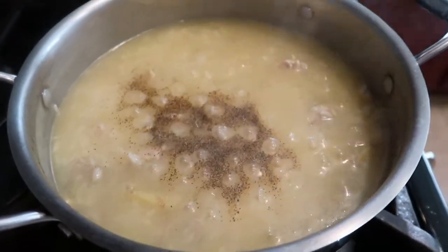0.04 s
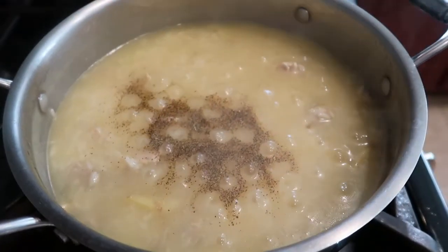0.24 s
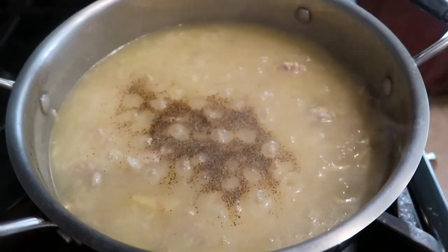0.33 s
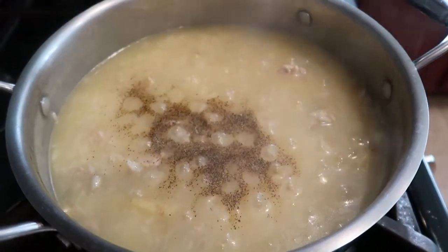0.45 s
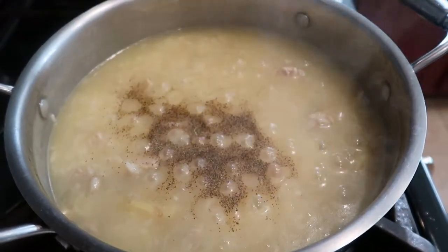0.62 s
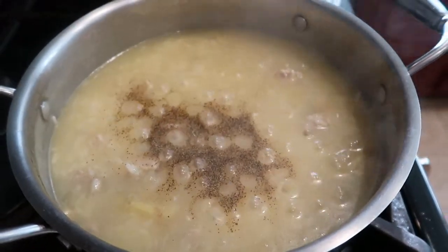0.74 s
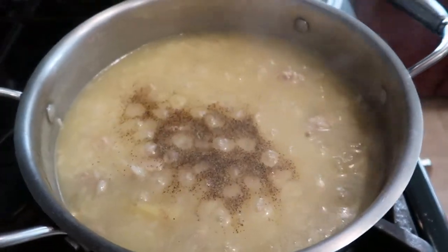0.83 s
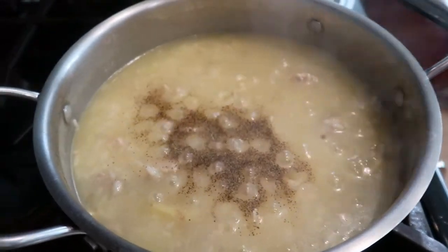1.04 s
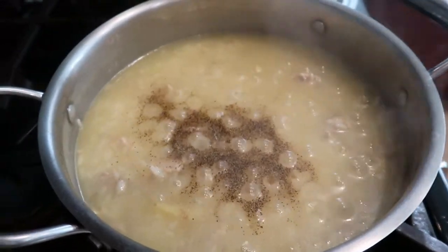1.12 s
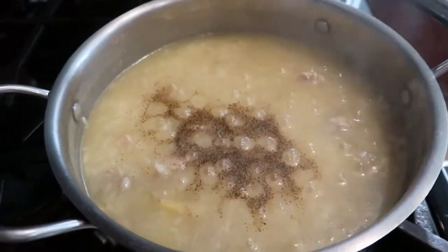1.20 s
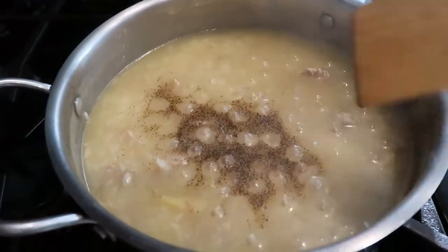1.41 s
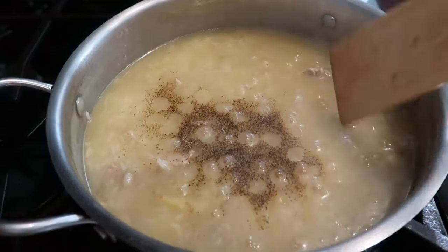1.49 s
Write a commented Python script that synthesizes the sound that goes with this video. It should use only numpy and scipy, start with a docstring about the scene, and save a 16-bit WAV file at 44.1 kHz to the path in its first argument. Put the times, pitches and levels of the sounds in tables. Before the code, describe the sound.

Thick porridge simmering in a pot, with one sharp knock on the worktop nearby.

```python
"""A stove rumbles and hums in a small kitchen while thick porridge simmers in a steel pot, steam bubbles
crackling at the surface throughout. At 0.2 s something hard is set down on the worktop close by, knocks
once and rocks to rest. From 0.6 s a few larger bubbles plop. Near the end, at 1.4 s, a wooden spoon
grazes the pot and rings its wall."""
import sys
import numpy as np
from scipy import signal
from scipy.io import wavfile

SR = 44100
rng = np.random.default_rng(int(sys.argv[2]) if len(sys.argv) > 2 else 0)


def dump(signal):
    """Clip the signal to [-1, 1] and save it as 16-bit WAV at the path in sys.argv[1]."""
    limited = np.clip(np.atleast_2d(signal).T, -1, 1)
    pcm = np.round(limited * 32767).astype(np.int16)
    wavfile.write(sys.argv[1], SR, pcm)


N = 68355


def from_db(db):
    """Decibels to gain."""
    return 10 ** (np.asarray(db) / 20)


def unit_rms(x):
    """Scale to rms 1."""
    return x / np.sqrt(np.mean(x ** 2) + 1e-20)


def at_hz(table, hz, column=1):
    """Interpolate a table column over log frequency."""
    table = np.array(table)
    return np.interp(np.log(hz), np.log(table[:, 0]), table[:, column])


def drift(rate_hz):
    """Slow random wander, rms 1."""
    hop, settle = 40, 2000
    pole = np.exp(-2 * np.pi * rate_hz * hop / SR)
    white = rng.standard_normal(N // hop + settle + 2)
    slow = signal.lfilter([1], [1, -2 * pole, pole * pole], white)[settle:]
    return np.interp(np.arange(N) / hop, np.arange(len(slow)), unit_rms(slow))


def click(start_s):
    """Unit impulse."""
    return 1.0 * (np.arange(N) == int(start_s * SR))


def ring(force, hz, t60_s):
    """One mode: each impulse starts a decaying sine."""
    r, w = np.exp(-np.log(1000) / (t60_s * SR)), 2 * np.pi * hz / SR
    return signal.lfilter([0, np.sin(w)], [1, -2 * r * np.cos(w), r * r], force + 1e-18)


def filtered(x, hz, kind, order=2):
    """Butterworth filter."""
    sos = signal.butter(order, np.clip(hz, 10, .45 * SR), kind, fs=SR, output="sos")
    return signal.sosfilt(sos, x + 1e-18)


def panned(x, db):
    """Pan by left-minus-right level."""
    return x * from_db([[db / 2], [-db / 2]])


# Stereo width. Each row: frequency in Hz, side minus mid in dB before side_db is added.
STEREO_WIDTH = [(60, -36), (130, -18.5), (330, -6.5), (700, -17.5), (1400, -9.5), (2800, -3), (5000, 5),
                (12000, -26.5)]


def noise_bands(size, side_db=0):
    """Yield centre Hz and stereo noise for each half octave."""
    edges_hz = 22 * 2 ** np.arange(0, 9.6, .5)
    white = rng.standard_normal((2, 2, size + SR // 10))
    for k, (low, high) in enumerate(zip(edges_hz, edges_hz[1:])):
        hz = np.sqrt(low * high)
        mid, side = filtered(white[k % 2], [low, high], "band")[:, -size:]
        yield hz, mid + from_db(at_hz(STEREO_WIDTH, hz) + side_db) * side * [[1], [-1]]


def diffuse(x, table, build_s, side_db):
    """Dense reflections build up, then decay band by band."""
    t = np.arange(SR * 3 // 4) / SR
    tail = 0
    for hz, band in noise_bands(len(t), side_db):
        t60_s = at_hz(table, hz, column=2)
        envelope = (1 - np.exp(-t / build_s)) * np.exp(-np.log(1000) * t / t60_s)
        tail = tail + band * envelope / np.linalg.norm(envelope) * from_db(at_hz(table, hz))
    return signal.fftconvolve(np.atleast_2d(x), tail, axes=1)[:, :N]


# Stove rumble and steam hiss. Each row: frequency in Hz, relative spectral density in dB.
RUMBLE_SPECTRUM = [(25, -17), (55, -3.5), (90, -8), (122, 12.5), (155, -6.5), (230, -2.5), (400, -10.5),
                   (750, -8.5), (1300, -20.5), (2300, -23.5), (5000, -30), (8000, -33.5), (13000, -42),
                   (16000, -77)]
# Stove hum. Each row: frequency in Hz, rms level in dB, waver rate in Hz.
HUM_TONES = [(59, -69, 12), (122.05, -49.5, 8.3), (220.1, -54.5, 18), (333, -64.5, 2.1), (715, -59.5, 18)]


def stove(rumble_db=-45.5, flicker_db=0.5, waver=.35):
    """Steady rumble and hiss with a wavering hum."""
    rumble = sum(band * from_db(at_hz(RUMBLE_SPECTRUM, hz) + flicker_db * drift(12))
                 for hz, band in noise_bands(N))
    t = np.arange(N) / SR
    hum = 0
    for hz, db, rate_hz in HUM_TONES:
        envelope = 1 + waver * drift(rate_hz)
        phase = 2 * np.pi * hz * t + 2 * waver * drift(rate_hz)
        hum = hum + from_db(db) * unit_rms(envelope * np.sin(phase))
    return from_db(rumble_db) * unit_rms(rumble) + hum


def bubble_clicks(pitches_hz, per_s, spread_db=3, clump_db=3):
    """Bubbles of random size come in clumps; pairs each pitch with its share of the clicks."""
    sizes = from_db(spread_db * np.minimum(rng.exponential(1, N), 4))
    born = rng.random(N) < per_s * from_db(clump_db * drift(12)) / SR
    count = len(pitches_hz)
    has_pitch = rng.integers(0, count, N) == np.arange(count)[:, None]
    return zip(pitches_hz, sizes * born * has_pitch)


def blubs(level_db=-50.5, t60_cycles=4.6, pan_spread_db=5):
    """Small dull bubbles ring for a few cycles all over the pot."""
    rings = sum(panned(ring(clicks, hz, t60_cycles / hz), pan_spread_db * rng.standard_normal())
                for hz, clicks in bubble_clicks(np.geomspace(573, 1500, 20), per_s=480))
    return from_db(level_db) * unit_rms(rings)


def puff(clicks, hz, rise_s=0.00031, decay_s=0.0015, edge_ratio=1.338, side_db=-24):
    """A bubble's skin tears and lets out a few milliseconds of steam around one pitch."""
    fall, rise = (signal.lfilter([1], [1, -np.exp(-1 / (tau_s * SR))], clicks + 1e-18)
                  for tau_s in (decay_s, rise_s))
    band_hz = [hz / edge_ratio, hz * edge_ratio]
    mid, side = unit_rms(filtered(rng.standard_normal((2, N)), band_hz, "band", order=4))
    return (fall - rise) * (mid + from_db(side_db) * side * [[1], [-1]])


# Colour of the small bursts. Each row: frequency in Hz, relative level in dB.
FIZZ_SPECTRUM = [(2800, -1.5), (4000, -2), (5500, -0.5), (7500, -16.5), (11000, -17)]
# Their brightness. Each row: time in seconds, tilt in dB per octave.
FIZZ_BRIGHTNESS = [(0, 7.5), (0.45, -2), (0.83, 1.5), (0.952, 5.5), (1.25, 4.5), (1.55, 0)]


def fizz(level_db=-56, pivot_hz=4000):
    """A crowd of small steam bursts, brighter when finer bubbles break."""
    tilt_db_per_octave = np.interp(np.arange(N) / SR, *np.transpose(FIZZ_BRIGHTNESS))
    crowd = 0
    for hz, clicks in bubble_clicks(np.geomspace(2800, 11000, 10), per_s=620):
        db = at_hz(FIZZ_SPECTRUM, hz) + tilt_db_per_octave * np.log2(hz / pivot_hz)
        crowd = crowd + from_db(db) * puff(clicks, hz)
    return from_db(level_db) * unit_rms(crowd)


# Loudest steam bursts. Each row: start in seconds, relative level in dB, centre in Hz.
STEAM_BURSTS = [(0.0774, -40.5, 3900), (0.1029, -47, 7000), (0.14, -37.5, 5000), (0.524, -48, 6000),
                (0.5454, -43, 6000), (0.5778, -36.5, 4500), (0.6055, -40.5, 3900), (0.6455, -37.5, 3900),
                (0.662, -54, 3300), (0.672, -68, 6000), (0.7112, -43.5, 4400), (0.7773, -37.5, 3330),
                (0.8249, -41.5, 4450), (0.861, -35.5, 3670), (0.918, -47.5, 10000), (0.973, -39, 4400),
                (0.9954, -48, 7340), (1.0128, -51, 3800), (1.0706, -44, 6100), (1.093, -53, 10500),
                (1.114, -42, 6350), (1.1430, -38.5, 4600), (1.161, -46, 7000), (1.223, -39, 6350),
                (1.3105, -38, 6760), (1.353, -41, 5100), (1.452, -37, 6000), (1.4987, -45, 4000),
                (1.5132, -41.5, 3900), (1.522, -43, 4150)]


def bursts(gain_db=2.5):
    """Single steam bubbles crack open at the surface."""
    return sum(from_db(db + gain_db) * puff(click(start_s), hz) for start_s, db, hz in STEAM_BURSTS)


def struck(blows, modes, scatter_db=.7):
    """Every blow rings all modes, each at a slightly different strength; mode signs alternate."""
    strengths = from_db(scatter_db * rng.standard_normal((len(blows), len(modes))))
    return sum((-1) ** k * from_db(db) * ring(strengths[:, k] @ blows, hz, t60_s)
               for k, (hz, db, t60_s) in enumerate(modes))


# Worktop contacts. Each row: start in seconds, force level in dB, softness as low-pass cutoff in Hz.
CONTACTS = [(0.2085, -0.5, 10000), (0.2129, -35, 1370), (0.3273, -12.5, 3650), (0.3303, -16.5, 3360),
            (0.3322, -22.5, 2500), (0.3561, -13.5, 3360), (0.3588, -16, 3000), (0.3647, -18, 1500),
            (0.3690, -11.5, 1500)]
# Worktop modes. Each row: frequency in Hz, gain in dB, t60 in seconds.
WORKTOP_MODES = [(101, -43, 0.31), (133, -45, 0.19), (317, -39, 0.16), (608.6, -21.5, 0.17),
                 (870, -9, 0.016), (1390, -24, 0.026), (1610, -4, 0.023), (1740, 8.5, 0.0043),
                 (2230, -37, 0.024), (2550, -6.5, 0.0095), (2844, -8, 0.015), (3120, -34.5, 0.13),
                 (3750, -9.5, 0.0089)]
# Dense ringing of things on the worktop. Each row: frequency in Hz, gain in dB, t60 in seconds.
CLATTER_BANDS = [(100, -20, 0.082), (294, 16.5, 0.32), (940, 13, 0.044), (1930, 22, 0.16),
                 (3000, 13, 0.039), (3700, -2.5, 0.02), (6000, -5, 0.026), (14000, -35, .02)]
# Kitchen reverberation. Each row: frequency in Hz, gain in dB, t60 in seconds.
KITCHEN_REVERB = [(100, 18, 0.17), (302, 5, .5), (740, 17.5, 0.71), (1680, 12, 1), (3000, 9.5, 0.8),
                  (3980, -11, 0.85), (7000, -38, 0.22), (14000, -38, .2)]


def knocks():
    """A hard thing hits the worktop a little to the right and rocks to rest; the kitchen reverberates."""
    blows = np.array([from_db(db) * filtered(click(start_s), hz, "low") for start_s, db, hz in CONTACTS])
    force = filtered(blows.sum(axis=0), 72.6, "high")
    crack = from_db(-9) * ring(force, hz=6260, t60_s=0.002)
    near_ear = struck(blows, WORKTOP_MODES) + crack
    far_ear = filtered(near_ear, 4870, "low", order=1)
    clatter = diffuse(force, CLATTER_BANDS, build_s=0.0043, side_db=-8)
    room = diffuse(force, KITCHEN_REVERB, build_s=0.002, side_db=-8)
    return np.array([far_ear, near_ear]) + clatter + room


# Larger bubbles. Each row: start in seconds, level in dB, starting pitch in Hz, t60 in seconds.
LARGE_BUBBLES = [(0.603, -45.5, 1935, 0.12), (0.636, -45, 890, 0.025), (0.6920, -24, 1320, 0.0079),
                 (0.9471, -31, 1050, 0.0092), (0.9460, -27.5, 720, 0.016), (0.966, -40.5, 1405, 0.042),
                 (1.132, -35, 1195, 0.02), (1.2460, -22.5, 1130, 0.0064), (1.2960, -34.5, 1900, 0.03)]


def plops(attack_s=0.00036, rise_per_s=2.3):
    """Large bubbles open with a short tone that rises a little."""
    tones = 0
    for start_s, db, hz, t60_s in LARGE_BUBBLES:
        age_s = np.maximum(np.arange(N) / SR - start_s, 0)
        envelope = (1 - np.exp(-age_s / attack_s)) * np.exp(-np.log(1000) * age_s / t60_s)
        phase = 2 * np.pi * hz * age_s * (1 + rise_per_s * age_s / 2)
        tones = tones + from_db(db) * envelope * np.sin(phase)
    return tones


# Spoon touches. Each row: start in seconds, force level in dB.
SPOON_TOUCHES = [(1.436, -42), (1.4415, -39.5), (1.4450, -46), (1.4496, -42), (1.455, -47)]
# Modes of spoon against wall. Each row: frequency in Hz, gain in dB, t60 in seconds.
SPOON_MODES = [(917, -2, 0.056), (1990, -1, 0.017), (2314, -8.5, 0.045), (2680, -3.5, 0.029),
               (2980, -3, 0.023), (3450, -7, 0.014), (3900, -22, 0.019), (4400, 2, 0.0069)]


def spoon():
    """The wooden spoon skips along the pot wall in a few light touches."""
    blows = np.array([from_db(db) * click(start_s) for start_s, db in SPOON_TOUCHES])
    return struck(blows, SPOON_MODES)


# Reflections inside the pot. Each row: frequency in Hz, gain in dB, t60 in seconds.
POT_REVERB = [(300, -6, 0.047), (1500, -2.5, 0.02), (5000, -8, 0.035), (14300, -30, .03)]


def scene():
    """The pot with its reflections, the stove and the knocks."""
    pot = bursts() + fizz() + blubs() + plops() + spoon()
    reflections = diffuse(pot, POT_REVERB, build_s=0.003, side_db=-11)
    return pot + reflections + stove() + knocks()


def record(dry):
    """Soft overload on the loudest peak, then a steep low-pass."""
    ceiling, cutoff_hz = .86, 15500
    rounded = dry / (1 + (dry / ceiling) ** 6) ** (1 / 6)
    return signal.sosfilt(signal.ellip(10, .1, 80, cutoff_hz, fs=SR, output="sos"), rounded)


dry = scene()
out = record(dry)
dump(out)
```